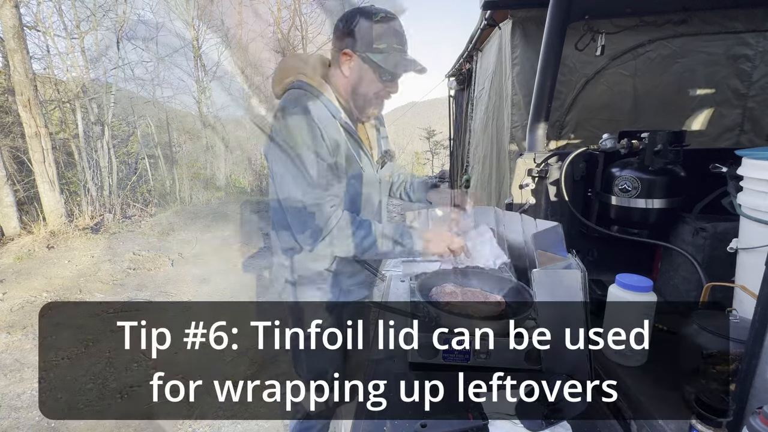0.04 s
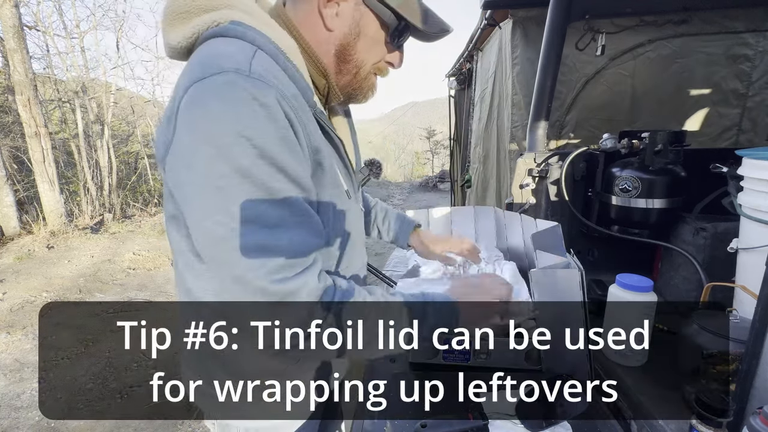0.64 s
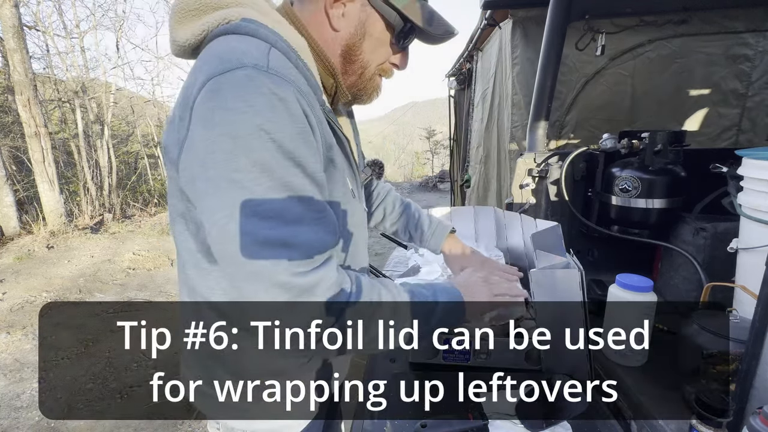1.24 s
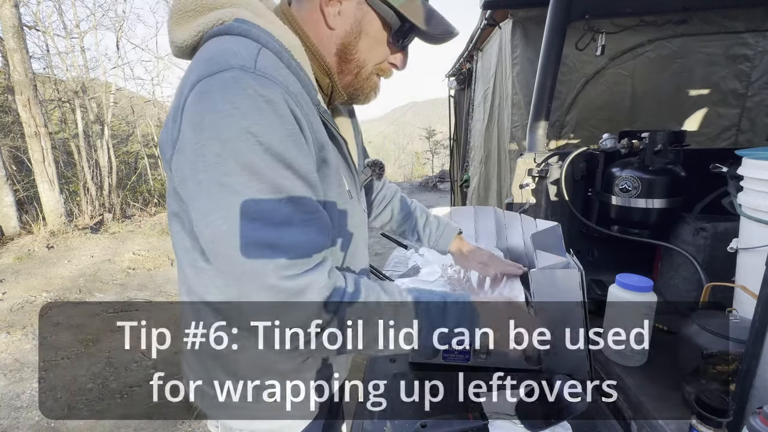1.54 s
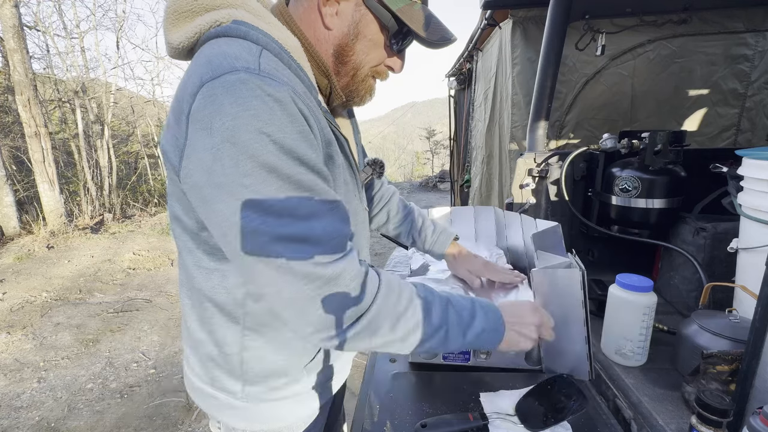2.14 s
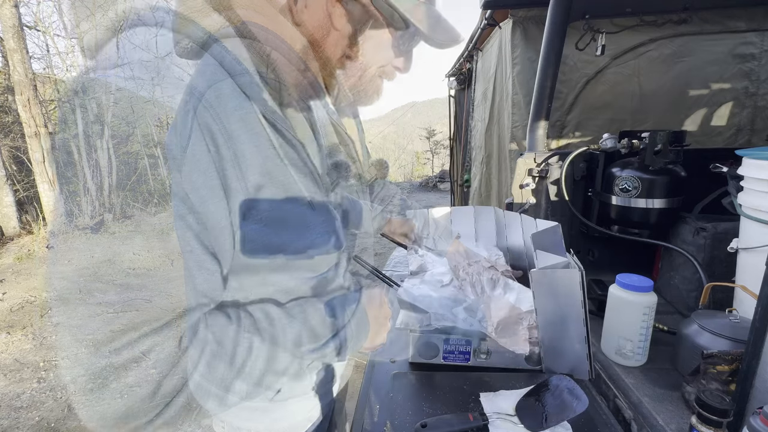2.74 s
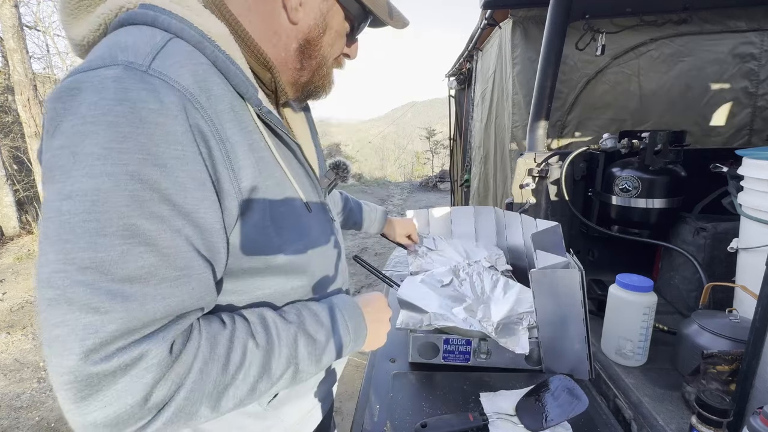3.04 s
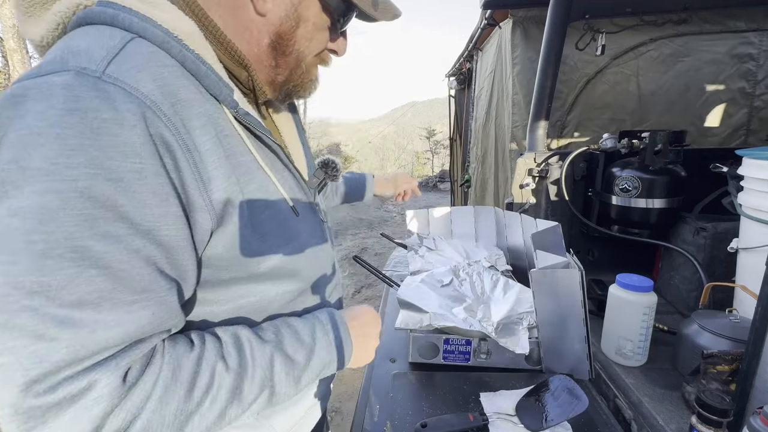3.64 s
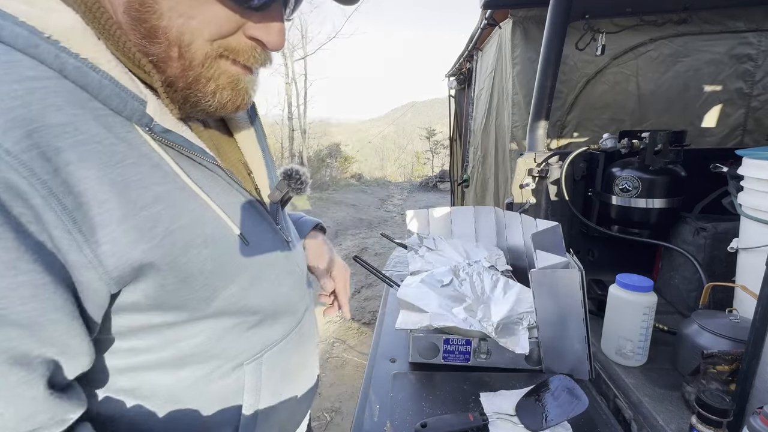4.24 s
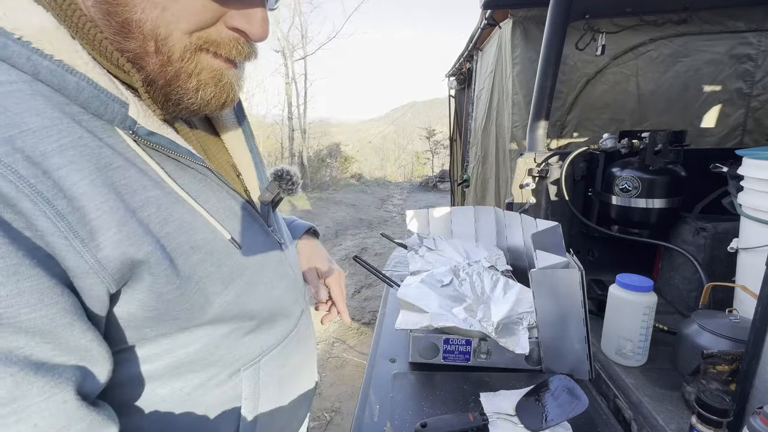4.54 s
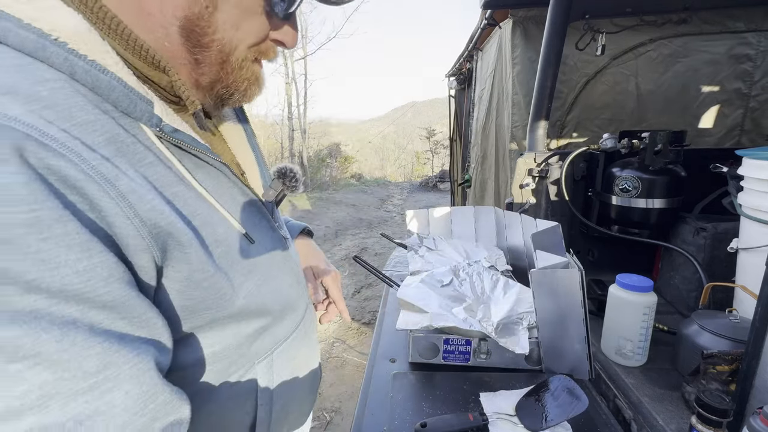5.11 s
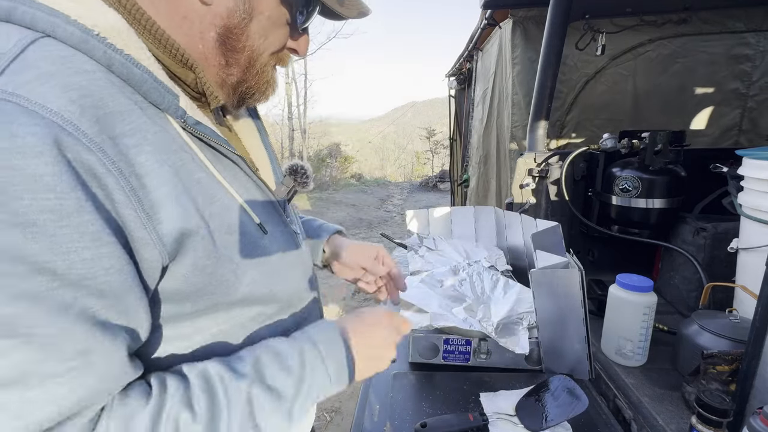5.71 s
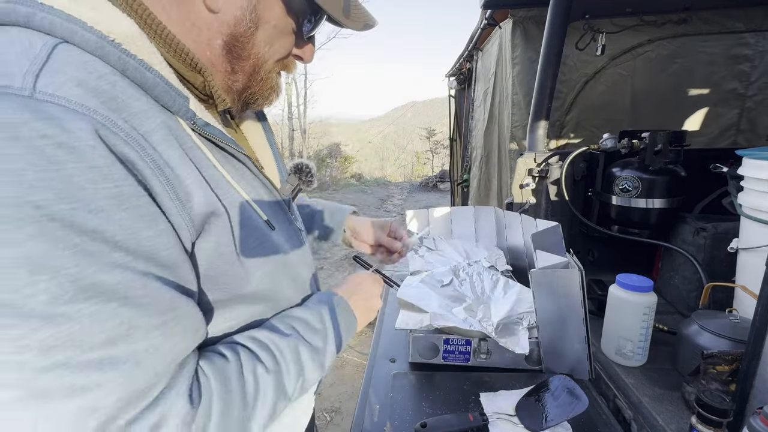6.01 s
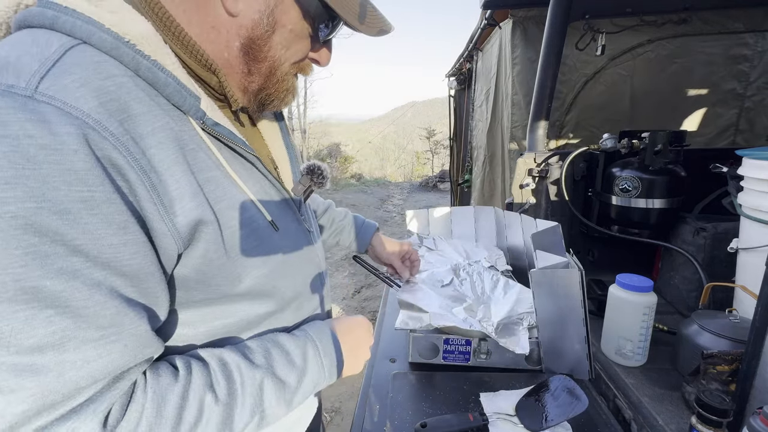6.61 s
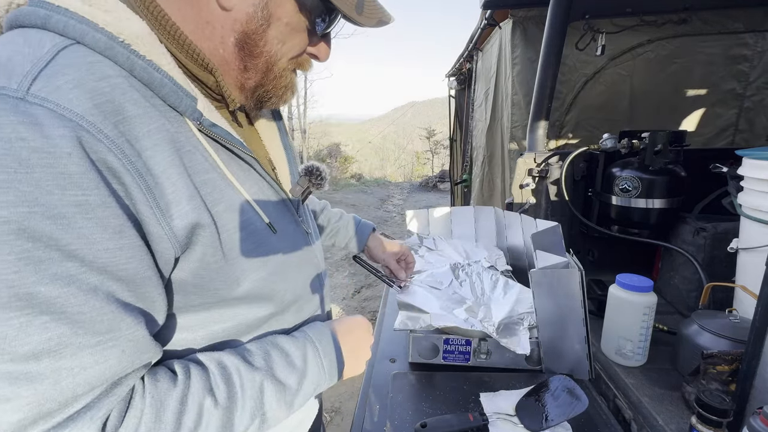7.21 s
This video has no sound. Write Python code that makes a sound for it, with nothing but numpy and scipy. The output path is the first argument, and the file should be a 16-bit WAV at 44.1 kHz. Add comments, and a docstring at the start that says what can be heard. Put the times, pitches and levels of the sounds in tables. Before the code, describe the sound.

Close to the microphone, meat sizzles without a break outdoors, a fine hiss full of tiny pops. Foil crackles briefly several times as it is squeezed onto the pan, while fat spits loudly and hands bump the cookware. Later the popping eases and scattered foil ticks stand out, with one more crinkle near the end. A faint low burner rumble and light scuffs of sleeves and shoes lie beneath.

```python
"""A bright sizzle runs throughout: a steak fries outdoors on a camp stove, with foil pressed on as a lid.
Water boils out of the fat in spurts of tiny bursts; larger bubbles pop, and the hollow under the foil
rings with them. The burner rumbles faintly, sleeves and shoes scuff, and hands knock the pan and
crumple the foil. Now and then the fat spits loudly or a crease in the foil ticks."""
import sys
import numpy as np
from scipy import signal
from scipy.fft import rfft, irfft, next_fast_len
from scipy.io import wavfile
from scipy.ndimage import uniform_filter1d

SR = 44100
rng = np.random.default_rng(int(sys.argv[2]) if len(sys.argv) > 2 else 0)


def store_wav(level_fs):
    """Save 16-bit WAV to argv[1]."""
    pcm = np.round(np.clip(np.atleast_2d(level_fs), -1, 1) * 32767)
    wavfile.write(sys.argv[1], SR, pcm.T.astype(np.int16))


N = 320086

# Levels in a table compare its rows; the functions set how loud each sound is overall.
# How hard the steak fries; it settles once the lid is on.
# Each row: time in seconds, fizz level in dB, pop level in dB.
FRYING_LEVELS = [(0, -38.5, -42), (.36, -35, -36.5), (.47, -33.5, -34.5), (.8, -35, -38.5),
                 (1.15, -36, -39), (2.4, -36, -39.5), (2.765, -37.5, -39), (2.79, -37, -40),
                 (3.3, -37.5, -41), (3.8, -37, -41.5), (4.7, -38, -47.5), (5.1, -38, -45.5),
                 (5.75, -37.5, -44), (6.0, -40, -47.5), (6.13, -37.5, -45), (6.65, -38.5, -43.5),
                 (7.26, -36.5, -44)]
# The pops rise in pitch as the lid closes. Each row: time in seconds, pitch in Hz.
POP_PITCHES = [(0, 3660), (.5, 3560), (1.2, 3720), (2.7, 4040), (2.9, 4180), (4.5, 4170), (5.5, 3900),
               (7.26, 4050)]
# The tone of the fine fizz. Each row: frequency in Hz, level in dB.
FIZZ_TONE = [(2500, -20), (3600, -9), (4500, -5.5), (5200, -1.5), (5750, -3.5), (6400, -1), (7200, -2.5),
             (8500, -2.5), (10000, -4), (12000, -7.5), (14000, -11), (16000, -12)]
# The notes of the pan under its foil. Each row: pitch in Hz, width in Hz, level in dB.
PAN_NOTES = [(1052, 326, 0.5), (1354, 264, 2.5), (1820, 220, -3), (2324, 190, 0), (2950, 164, -2.5)]
# Pockets of air under the foil ring for a while.
# Each row: start and end in seconds, pitch in Hz, width in Hz, boost in dB.
AIR_POCKETS = [(.2, 1.1, 2950, 400, 0), (.95, 2.05, 3700, 220, 7.5), (.95, 2.8, 4330, 200, 3.5),
               (2.202, 2.77, 3270, 200, 4.5), (2.2, 2.77, 5150, 500, 2), (2.2, 3.4, 7000, 700, 1.5),
               (2.798, 3.9, 4130, 280, 2.5), (2.8, 3.6, 7900, 2000, 1.5), (4.0, 4.85, 8200, 280, 3.5),
               (4.1, 4.9, 9550, 500, 4), (4.0, 4.8, 4880, 260, 3.5), (4.2, 5.1, 6150, 250, 1.5),
               (5.1, 5.95, 6530, 300, 1), (5.3, 6.3, 2460, 200, 3.5), (5.3, 6.3, 2950, 170, 0.5),
               (6.0, 7.4, 4400, 400, 0.5), (6.5, 7.4, 1820, 150, 7)]
# Echoes off the stove's wind shield and the cook, for each way the cook stands. Each row: time in
# seconds, shield delay in milliseconds, shield level in dB, cook delay in milliseconds, cook level in dB.
CLOSE_ECHOES = [(0.8, 0.99, -22, 1.46, -12), (2.5, 0.98, -16, 1.4, -21), (3.1, 0.95, -20, 1.3, -29),
                (3.9, 0.71, -28, 1.8, -24), (4.3, 1, -26, 1.66, -22), (4.75, 0.89, -26, 1.335, -18),
                (5.15, 0.77, -27, 1.68, -16), (5.8, 0.66, -25, 1.6, -12), (6.8, 0.69, -17, 2.2, -23)]
# Faint noise between movements, stronger while the hands rest on the foil.
# Each row: time in seconds, rustle level in dB, rumble level in dB.
BACKGROUND_LEVELS = [(0, -54, -60), (2.65, -51, -65), (3.2, -57.5, -67.5), (4.6, -59, -67.5),
                     (5.2, -58.5, -65), (5.9, -59, -68.5), (7.26, -56.5, -66.5)]
# Movements of hands, sleeves and shoes.
# Each row: start in seconds, length in seconds, rustle level in dB, thump level in dB.
MOVEMENTS = [(0, 0.018, -44, -61), (.205, 0.052, -48.5, -59), (0.463, 0.087, -48.5, -60),
             (0.835, .075, -45, -67), (.96, 0.15, -52, -64), (1.316, 0.081, -46.5, -68),
             (1.481, .05, -47.5, -66), (1.547, .07, -54, -60), (1.74, 0.16, -51.5, -64),
             (1.926, 0.2, -48.5, -60), (2.213, 0.16, -52, -62), (2.304, 0.19, -51.5, -65),
             (2.555, 0.026, -49, -57), (2.624, 0.095, -52, -68), (2.76, .04, -61, -56),
             (2.875, 0.026, -68, -63), (3.0, 0.1, -55, -61), (3.287, 0.036, -55, -58),
             (3.45, 0.025, -54, -76), (4.89, .035, -60, -59), (5.08, 0.076, -50.5, -75),
             (5.318, 0.061, -51, -66), (6.558, .025, -56, -65), (6.705, 0.055, -55, -70),
             (6.756, 0.062, -49.5, -65), (6.82, 0.093, -55, -60)]
# The tones of the burner and of the rustle. Each row: frequency in Hz, level in dB.
BURNER_TONE = [(18, -23), (35, -13), (55, -7), (85, -4), (115, -0.5), (180, -0.5), (260, -2.5), (450, -16)]
RUSTLE_TONE = [(110, -28), (200, -10.5), (330, -2), (500, -1), (750, -1), (1100, 0.5), (1700, -8),
               (2800, -4), (6000, -14)]
# Soft knocks on pan and table, and shoes scuffing the ground around 5.1 to 5.4 s. Each row: start in seconds,
# level in dB, pitch in Hz.
SOFT_KNOCKS = [(0.019, -32, 404), (0.477, -37, 476), (1.481, -33, 506), (1.744, -31.5, 450),
               (2.573, -29, 517), (3.293, -34, 520), (4.915, -37.5, 336), (5.114, -35.5, 447),
               (5.159, -38, 729), (5.284, -42, 805), (5.327, -36, 820), (5.372, -33.5, 360),
               (6.567, -41, 320)]
# Squeezes of the foil. Each row: middle in seconds, half length in seconds, level in dB.
FOIL_SQUEEZES = [(0.02, 0.025, -44), (.24, 0.021, -33.5), (.46, 0.032, -39), (0.881, 0.033, -33),
                 (.98, .04, -39), (1.36, 0.075, -39), (1.747, 0.021, -36.5), (3.354, .015, -38),
                 (5.095, 0.03, -42), (5.332, 0.0091, -37), (6.81, 0.047, -36)]
# The tone of crumpling foil. Each row: frequency in Hz, level in dB.
FOIL_TONE = [(400, -3), (900, -4), (1700, -5), (4000, 0.5), (9000, 1.5), (16000, -8)]
# Single loud spits of fat. Each row: start in seconds, level in dB, pitch in Hz.
FAT_SPITS = [(0.2935, -22, 3000), (0.4744, -25, 4210), (0.6724, -21.5, 3900), (0.6945, -26, 3700),
             (0.7756, -23.5, 3820), (1.0223, -23, 3730), (1.203, -27, 3650), (1.507, -21.5, 3600),
             (1.5204, -19, 4040), (1.706, -27, 3690), (2.0273, -24, 4370), (2.0412, -26, 4100),
             (2.1128, -23.5, 3830), (2.2672, -22, 5160), (2.354, -25.5, 3500), (2.4612, -19, 3560),
             (2.721, -27, 4500), (2.77, -27, 3900), (3.2277, -23, 4070), (3.27, -29, 4190),
             (3.3522, -23, 4300), (4.1884, -26.5, 3900), (4.869, -29, 4170), (5.1856, -27, 4170),
             (5.703, -32, 4210), (5.7612, -25, 3980), (6.276, -25.5, 4060), (6.4504, -30, 4230),
             (6.7012, -34, 4050), (7.0394, -31, 2610)]
# Sharp ticks of the foil creasing. Each row: start in seconds, level in dB.
CREASE_TICKS = [(2.941, -28.5), (3.185, -33), (3.435, -32), (3.5677, -28.5), (3.858, -33), (4.08, -33),
                (4.974, -32), (4.9967, -34), (6.0298, -28), (6.155, -28), (6.415, -31), (6.468, -27),
                (6.6308, -32.5), (6.7925, -23), (7.129, -35)]


def from_db(db):
    """Turn decibels into a gain, the number a sound is multiplied by."""
    return 10 ** (np.asarray(db) / 20)


def curves(rows):
    """Join a table's rows with straight lines over time: one curve for each column after the first."""
    times, *columns = np.transpose(rows)
    return [np.interp(np.arange(N) / SR, times, column) for column in columns]


def evened(x):
    """Hold the level near 1 over every tenth of a second; faster detail stays."""
    power = uniform_filter1d(x ** 2, size=SR // 10)
    return x / np.sqrt(np.maximum(power, 1e-20))


def with_tone(x, tone):
    """Turn each frequency up or down as a tone table says."""
    hz, db = np.transpose(tone)
    size = next_fast_len(N + SR // 10)
    all_hz = np.maximum(np.arange(size // 2 + 1) * SR / size, 1)
    gain = from_db(np.interp(np.log(all_hz), np.log(hz), db, left=-90, right=-90))
    return irfft(rfft(x, size) * gain, size)[:N]


def resonance(x, hz, width_hz):
    """Make a sound ring at one pitch; the narrower the width, the longer it rings."""
    decay = np.exp(-np.pi * width_hz / SR)
    feedback = [1, -2 * decay * np.cos(2 * np.pi * hz / SR), decay ** 2]
    return signal.lfilter(np.array([1, 0, -1]) * (1 - decay ** 2) / 2, feedback, x + 1e-18)


def clicks(per_s, spread_db):
    """Random clicks of either sign and of varied size."""
    sizes = from_db(spread_db * np.minimum(rng.exponential(1, N), 4))
    return (rng.random(N) < per_s / SR) * sizes * rng.choice([-1, 1], N)


def spurts(per_s, spread_db, life_s, steady):
    """A gain that keeps jumping up and dying away, on top of a steady share."""
    power = signal.lfilter([1], [1, -np.exp(-1 / (life_s * SR))], clicks(per_s, spread_db) ** 2)
    return np.sqrt(steady + (1 - steady) * power / power.mean())


def puff(life_s):
    """A short burst of noise that dies away."""
    t = np.arange(SR // 10) / SR
    return rng.standard_normal(len(t)) * np.exp(-t / life_s)


def blip(hz, rise_s):
    """A short note that swells and dies away."""
    t = np.arange(SR // 10) / SR
    return t / rise_s * np.exp(1 - t / rise_s) * np.sin(2 * np.pi * hz * t)


def add(out, start_s, peak_db, sound):
    """Mix a short sound in at the given time and peak level."""
    start = round(start_s * SR)
    out[start:start + len(sound)] += (from_db(peak_db) * sound / np.abs(sound).max())[:N - start]


def sizzle():
    """The same spurts of steam drive the fizz, the pops and the pan; lone snaps stand out of them."""
    fizz_db, pop_db = curves(FRYING_LEVELS)
    pan_db = -49.38 + 0.26 * (pop_db + 42)  # the pan follows about a quarter of the pops' rise and fall
    pop_hz, = curves(POP_PITCHES)
    boil = spurts(per_s=260, spread_db=2.1, life_s=0.0041, steady=0.61)
    crackle = evened(boil * clicks(per_s=18000, spread_db=2.0))
    tiny = bubbles(boil * clicks(per_s=2500, spread_db=2.5), 7476, scatter_octaves=.5, sharpness=28)
    fizz = evened(with_tone(crackle + from_db(-4.5) * tiny, FIZZ_TONE))
    pops = bubbles(boil * clicks(per_s=3000, spread_db=3.5), pop_hz, scatter_octaves=.21, sharpness=7.7)
    snaps = bubbles(clicks(per_s=130, spread_db=3.0), 2880, scatter_octaves=.55, sharpness=2.7)
    lone_bursts = evened(clicks(per_s=300, spread_db=3.5))
    pan = evened(pan_ring(crackle + from_db(-0.5) * lone_bursts))
    hiss = from_db(fizz_db - 0.5) * fizz + from_db(pop_db - 2) * pops + from_db(pan_db - 3.62) * snaps
    dip_at_s, dip_half_s, dip_edge_s, dip_db = 0.095, 0.045, 0.026, -7.5  # the hiss dips briefly
    from_dip_s = np.abs(np.arange(N) / SR - dip_at_s)
    dip = from_db(dip_db * np.clip((dip_half_s - from_dip_s) / dip_edge_s + .5, 0, 1))
    return with_echoes(dip * air_pockets(hiss) + from_db(pan_db) * pan)


def bubbles(bursts, pitch_hz, scatter_octaves, sharpness):
    """Each bursting bubble rings briefly at a pitch of its own, scattered around pitch_hz."""
    pitches = np.geomspace(1200, 15000, 36)
    own_octave = np.log2(pitch_hz) + scatter_octaves * rng.standard_normal(N)
    nearest = np.round(np.interp(own_octave, np.log2(pitches), np.arange(len(pitches))))
    rings = (resonance(bursts * (nearest == k), hz, hz / sharpness) / np.sqrt(hz)
             for k, hz in enumerate(pitches))
    return evened(sum(rings))


def pan_ring(x):
    """The hollow between pan and foil rings at several notes at once."""
    return sum((-1) ** k * from_db(db) * resonance(x, hz, width)
               for k, (hz, width, db) in enumerate(PAN_NOTES))


def air_pockets(x):
    """Each pocket of air under the foil boosts its own pitch while it stays open."""
    t, out, fade_s = np.arange(N) / SR, x, 0.084
    for start, end, hz, width, boost_db in AIR_POCKETS:
        is_open = np.clip(np.minimum(t - start, end - t) / fade_s + .5, 0, 1)
        out = out + (from_db(boost_db) - 1) * is_open * resonance(x, hz, width)
    return out


def with_echoes(x):
    """Close echoes make the sizzle hollow; each way of standing fades into the next."""
    n, out = np.arange(N), x
    times = np.array(CLOSE_ECHOES)[:, 0]
    for s, shield_ms, shield_db, cook_ms, cook_db in CLOSE_ECHOES:
        shield, cook = (np.interp(n - ms * SR / 1000, n, x) for ms in (shield_ms, cook_ms))
        share = np.interp(n / SR, times, np.where(times == s, 1, 0))
        out = out + share * (from_db(shield_db) * shield + from_db(cook_db) * cook)
    return out


def rumble():
    """Smooth low noise of the flame and the open air, and the dull thump of each movement."""
    _, background_db = curves(BACKGROUND_LEVELS)
    thump_power = sum((from_db(db) * movement(s, length)) ** 2 for s, length, _, db in MOVEMENTS)
    level = np.sqrt(from_db(background_db) ** 2 + thump_power)
    noise = with_tone(rng.standard_normal(N), BURNER_TONE)
    return from_db(0.15) * level * noise / noise.std()


def movement(start_s, length_s, rise_s=0.012, fade_s=0.041):
    """The gain of one movement: it sets in quickly, holds and dies away."""
    t = np.arange(N) / SR - start_s
    return np.clip(t / rise_s, 0, 1) * np.exp(-np.clip((t - length_s) / fade_s, 0, 20))


def rustle():
    """Hands, sleeves and shoes scuff in clumps of small dull slips, swelling with each movement."""
    background_db, _ = curves(BACKGROUND_LEVELS)
    scuff_power = sum((from_db(db) * movement(s, length)) ** 2 for s, length, db, _ in MOVEMENTS)
    level = np.sqrt(from_db(background_db) ** 2 + scuff_power)
    slips = clicks(per_s=3500, spread_db=1.5)
    clumps = spurts(per_s=110, spread_db=3.5, life_s=0.0036, steady=0.69)
    return from_db(4.5) * level * evened(with_tone(slips * clumps, RUSTLE_TONE))


def knocks():
    """Soft blows on pan and table, and scuffs of shoes on the ground, die away fast, with some rubbing as the
    contact settles."""
    out = np.zeros(N)
    for s, db, hz in SOFT_KNOCKS:
        thud = blip(hz, rise_s=0.0036)
        rub = resonance(puff(life_s=0.017), hz, width_hz=350)
        dull_rub = resonance(rub, hz, width_hz=1000)
        add(out, s + 0.00092, db - 4, thud + from_db(16.5) * dull_rub)
    return out


def foil_crumples():
    """Squeezed foil gives way at many creases: a bright, dense, fairly even crackle."""
    t = np.arange(N) / SR
    squeeze = sum(from_db(db) * np.exp(-.5 * ((t - s) / half_s) ** 2) for s, half_s, db in FOIL_SQUEEZES)
    slight_flutter = spurts(per_s=200, spread_db=-1.5, life_s=0.0044, steady=0.67)
    creases = with_tone(slight_flutter * clicks(per_s=4000, spread_db=4.0), FOIL_TONE)
    return squeeze * evened(creases)


def spits():
    """A drop of water bursts in the fat: a sharp crack, a brief ping and a trail of spray."""
    out = np.zeros(N)
    for s, db, hz in FAT_SPITS:
        ping = blip(hz, rise_s=0.00035)
        spray = resonance(puff(life_s=0.0066), hz, width_hz=2400)
        crack = resonance(puff(life_s=.0011), hz=7000, width_hz=5400)
        add(out, s + 0.000822, db + 4.5, ping + from_db(-4) * spray + from_db(-8) * crack)
    return out


def foil_ticks():
    """A crease snaps over and sets the pan ringing, most of all its lowest notes."""
    out = np.zeros(N)
    for s, db in CREASE_TICKS:
        snap = puff(life_s=0.00024)
        ring = pan_ring(resonance(snap, hz=1210, width_hz=1240))
        add(out, s + 0.00103, db + 4, ring + from_db(-18) * snap)
    return out


def scene():
    """All the sounds in one channel, close by and in the open air."""
    return (sizzle() + rumble() + rustle() + knocks() + foil_crumples() + spits() + foil_ticks())[None]


def record(dry):
    """The very highest treble is cut off steeply."""
    cutoff_hz = 15800
    return signal.sosfilt(signal.ellip(12, .1, 80, cutoff_hz, fs=SR, output="sos"), dry)


dry = scene()
out = record(dry)
store_wav(out)
```